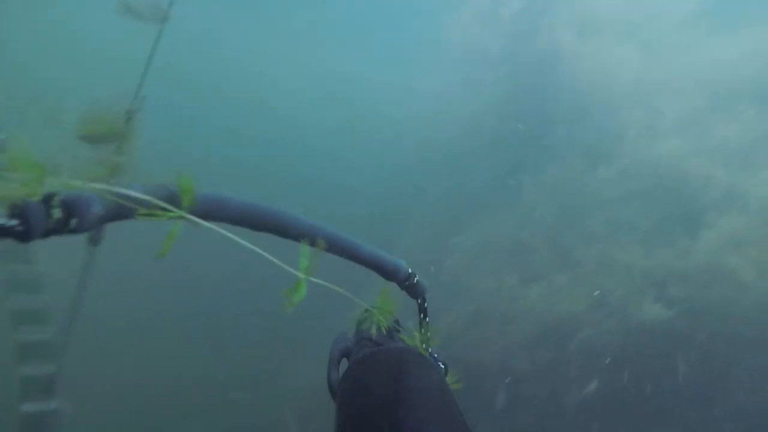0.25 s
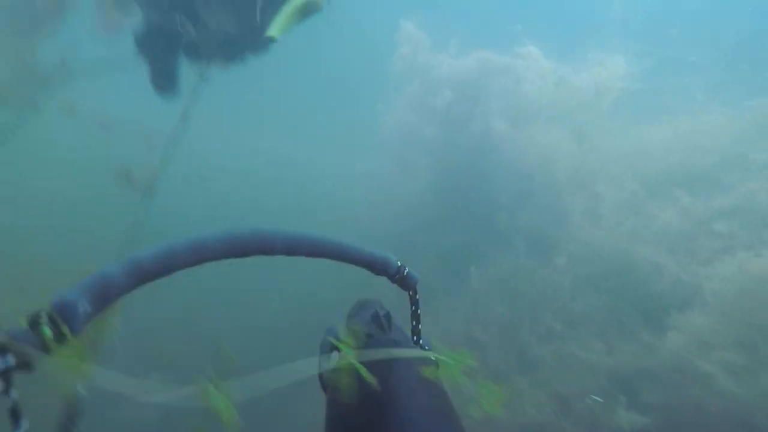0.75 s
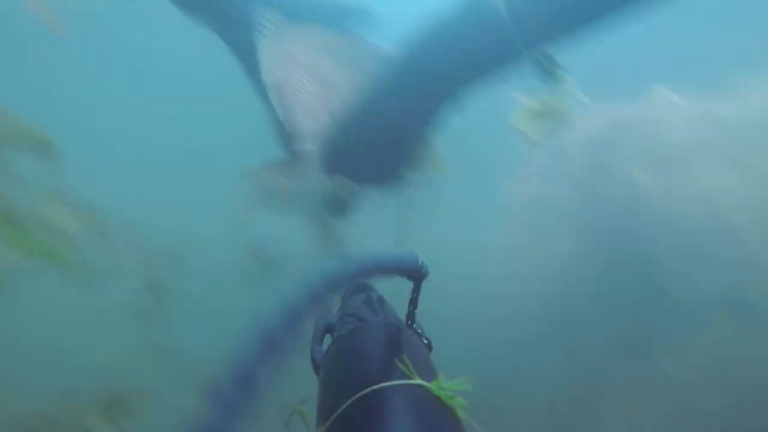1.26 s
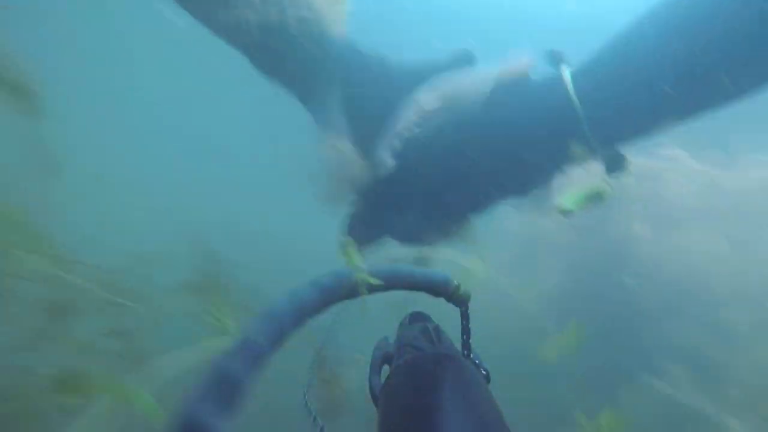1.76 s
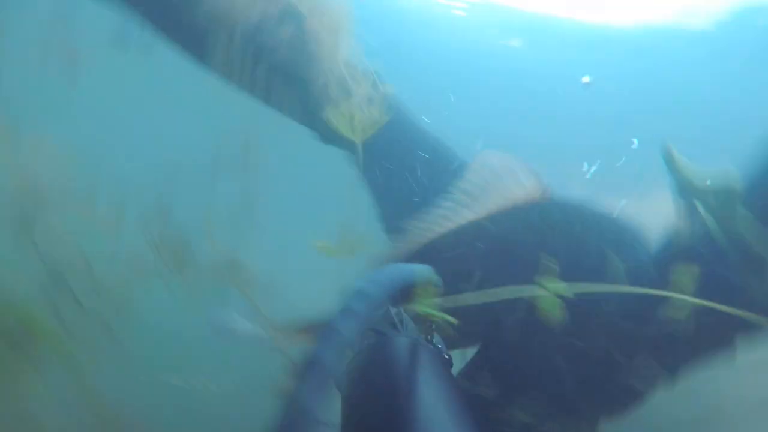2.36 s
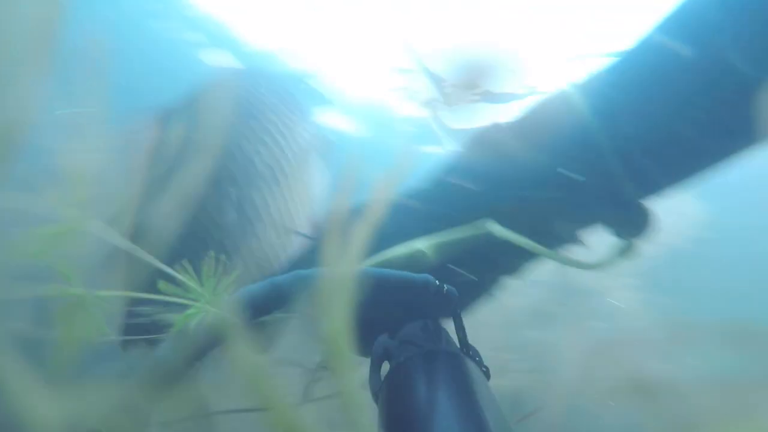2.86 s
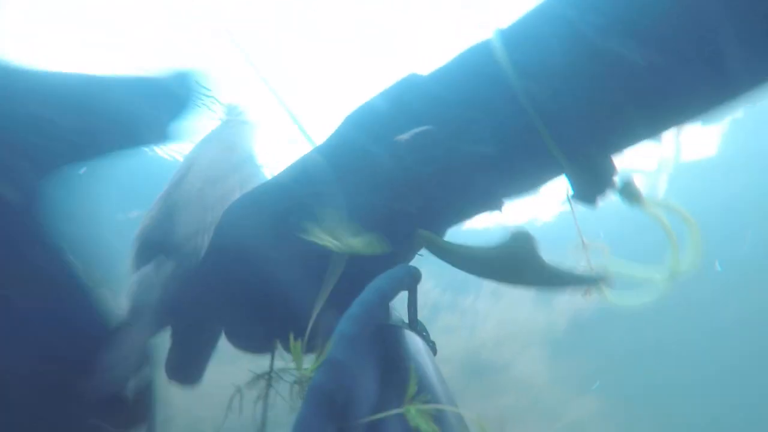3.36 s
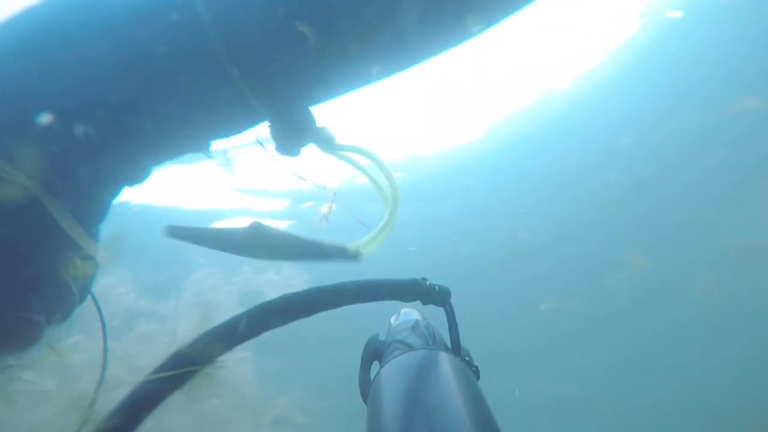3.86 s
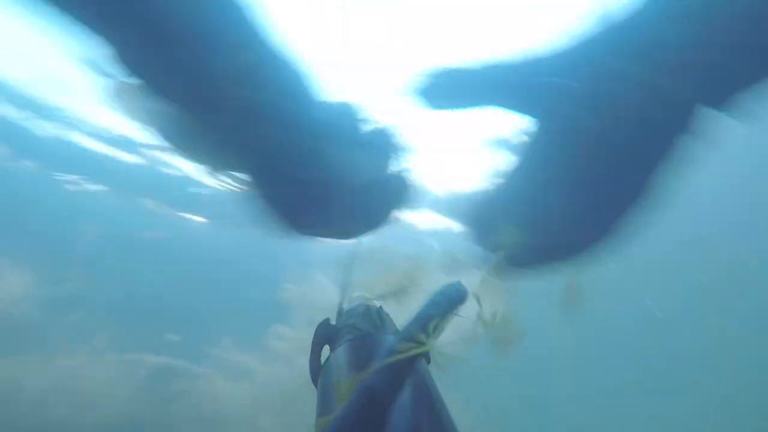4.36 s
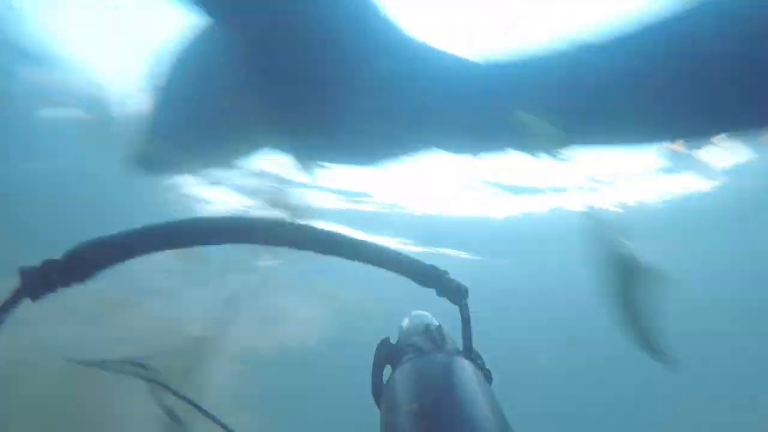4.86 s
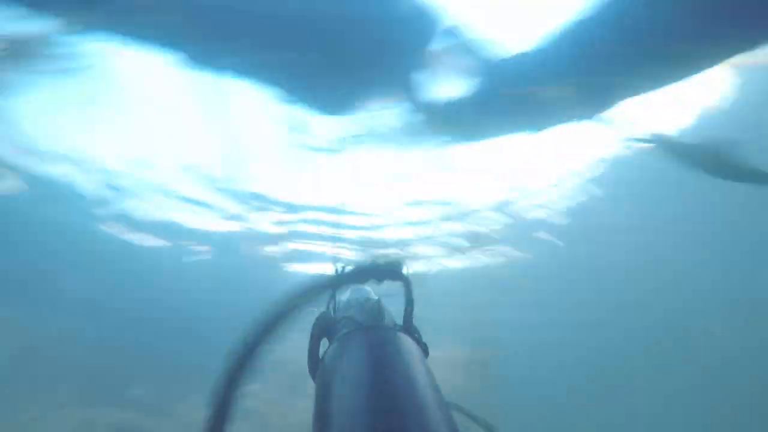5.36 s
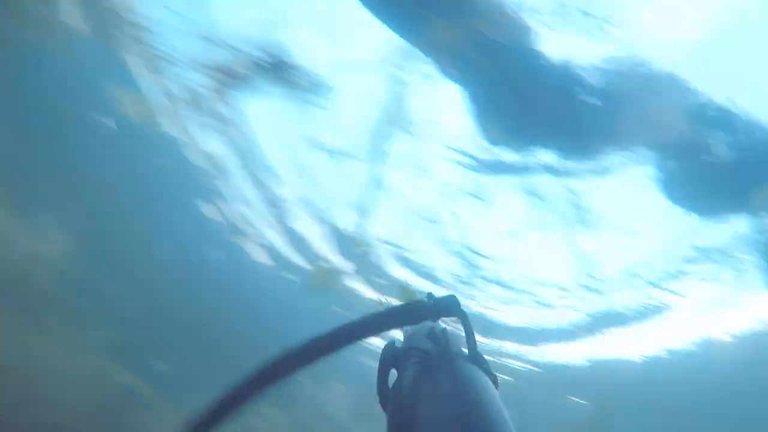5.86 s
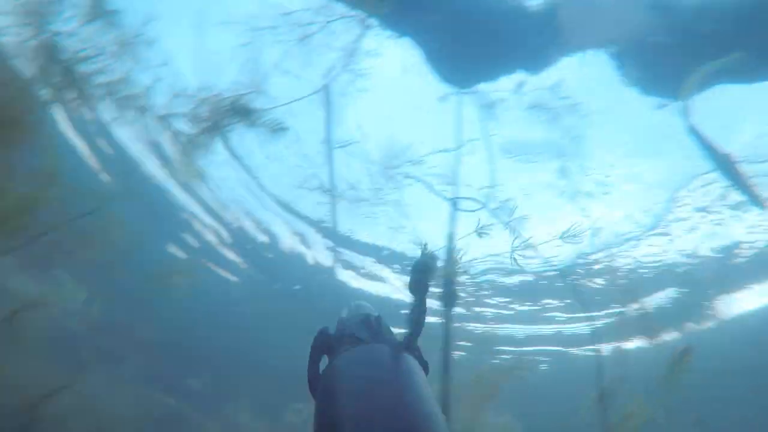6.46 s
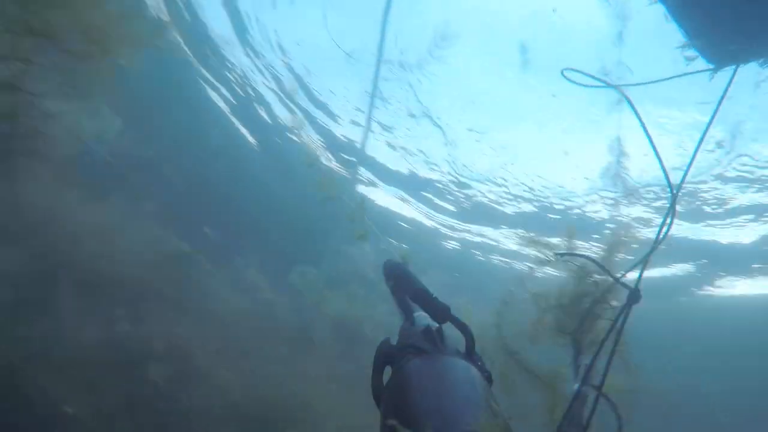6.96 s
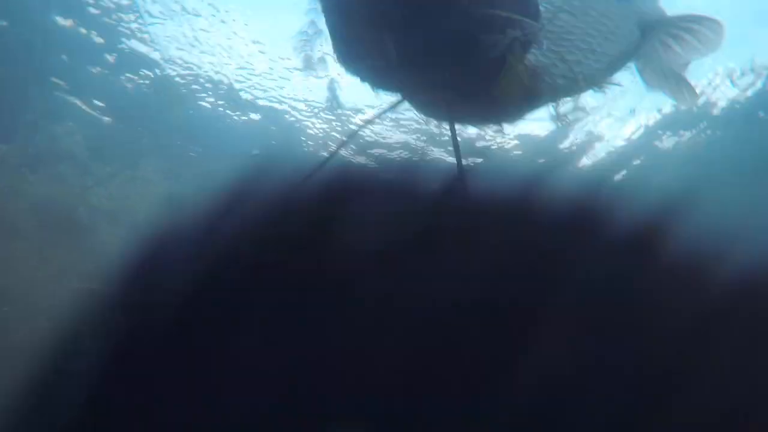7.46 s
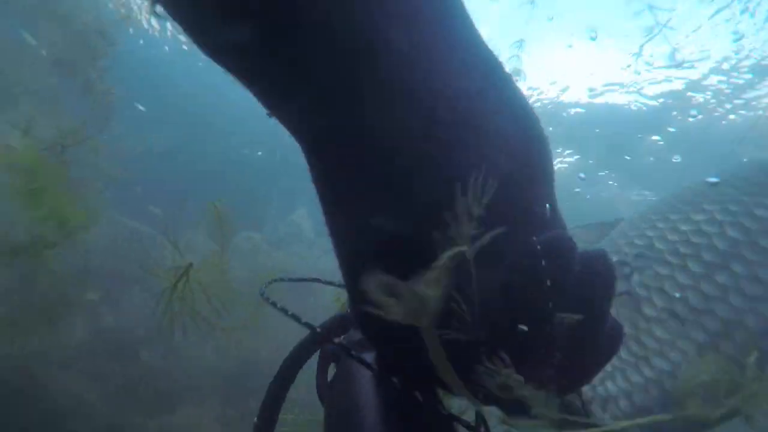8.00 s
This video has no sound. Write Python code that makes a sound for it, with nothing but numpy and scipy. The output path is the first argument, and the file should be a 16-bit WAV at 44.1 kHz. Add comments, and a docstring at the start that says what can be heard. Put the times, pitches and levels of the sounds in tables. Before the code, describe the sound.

Underwater handling noise: a deep wobbling hum, soft thuds and weed rubbing over a hollow shell, building to hard clacks near seven seconds.

```python
"""Speargun housing knocked about under water

A camera in a plastic housing rides on a diver's speargun in shallow water while the diver grapples with a fish.
Jolts ring the mount at its low resonance; thumps, knocks and scrapes excite the modes of the shell.
Water, line and weed drag over it as noise through those modes; small ticks, pings and crackle lie on top.
Two microphones inside hear each mode with their own level and phase."""
import sys
import numpy as np
from scipy import signal
from scipy.io import wavfile

SR = 44100
rng = np.random.default_rng(int(sys.argv[2]) if len(sys.argv) > 2 else 0)


def to_wav(s):
    """Save 16-bit WAV."""
    ch = np.atleast_2d(s).T  # columns
    pcm = np.round(np.clip(ch, -1, 1) * 32767)  # PCM
    wavfile.write(sys.argv[1], SR, pcm.astype(np.int16))


N = 362943

# modes of the big panels, base values that each source scales:
# pitch_hz, width_hz, level_db, left_minus_right_db, left_lead_rad
PANEL_MODES = [(119.5, 29, -15, 5, 0.1), (176.6, 38.8, 1.5, 3, 0.63), (252, 47.8, 0.5, 7, 0.94),
               (304, 220, -7.5, -1.5, 2.35), (396.4, 61.5, -9.5, 2, 0.09), (491, 60, -13, 3, 3.78)]
# modes of the stiff parts, same columns
STIFF_MODES = [(716, 104, 2, 0.5, 1.95), (862, 109, 0.5, -1, 2.44), (1000, 174, -11, -1, 2.29),
               (1330, 232, -8, -1.5, 2.01), (1772, 320, -9, -1.5, 1.36), (1995, 260, -6.5, -2, 1.38),
               (2600, 390, -12.5, 3, -1.5), (3280, 550, -14, 0, 0.95)]


def from_db(db):
    """Decibels to amplitude gain."""
    return 10 ** (np.asarray(db) / 20)


def rms_one(x):
    """Scale to rms 1."""
    return x / np.sqrt(np.mean(np.abs(x) ** 2) + 1e-20)


def in_time(rows):
    """Interpolate each column of a curve to one value per sample."""
    s, *columns = np.transpose(rows)
    return [np.interp(np.arange(N) / SR, s, column) for column in columns]


def drift(rate_hz):
    """Slow random curve of rms 1: noise at every 40th sample through a double one-pole low-pass."""
    pole = np.exp(-80 * np.pi * rate_hz / SR)
    noise = rng.standard_normal(N // 40 + 2002)
    slow = signal.lfilter([1], [1, -2 * pole, pole * pole], noise)[2000:]  # drop the settling
    return np.interp(np.arange(N) / 40, np.arange(len(slow)), rms_one(slow))


def butter(x, hz, kind, order=2):
    """Butterworth filter along time."""
    return signal.sosfilt(signal.butter(order, hz, kind, fs=SR, output="sos"), x)


def resonate(force, hz, width_hz):
    """Complex motion of one mode; a unit click rings from height 1."""
    pole = np.exp((2j * hz - width_hz) * np.pi / SR)
    return signal.lfilter([1], [1, -pole], force + 1e-18)


def at_ports(motion, balance_db, lead_rad):
    """Two microphones sit on different spots of a mode: own level, own phase."""
    side = np.array([[.5], [-.5]])
    return np.real(motion * from_db(balance_db * side) * np.exp(1j * lead_rad * side))


def strokes(rows, shapes):
    """Lay one shape at each row's time with the row's level."""
    out = np.zeros(N + shapes.shape[1])
    for (start_s, level_db, *_), shape in zip(rows, shapes):
        out[round(start_s * SR):][:len(shape)] += from_db(level_db) * shape
    return out[:N]


def push(hz, turns):
    """Force under a smooth window of a few turns of one pitch; the window sums to 1, the cosine is doubled."""
    t = np.arange(4000) / SR
    window = np.sin(np.pi * np.clip(t * hz / turns, 0, 1)) ** 2
    return 2 * window * np.cos(2 * np.pi * hz * t) / window.sum()


def lay(rows, shapes, gain_db):
    """Each small contact reaches the two microphones with a random balance and phase."""
    out = np.zeros((2, N))
    spots = rng.standard_normal((len(rows), 2))
    for (start_s, level_db, _), shape, (balance, lead_rad) in zip(rows, shapes, spots):
        heard = from_db(level_db + gain_db) * at_ports(shape, 1.5 * balance, lead_rad)
        out[:, round(start_s * SR):][:, :len(shape)] += heard
    return out


def held(rows, rise_s, fall_s):
    """For each row a shape that rises from the start, holds at 1 and falls after the end."""
    t = np.arange(N) / SR
    return np.array([np.clip(np.minimum((t - start_s) / rise_s, 1 + (end_s - t) / fall_s), 0, 1)
                     for start_s, end_s, *_ in rows])


def struck_modes():
    """Modes that a touch reaches; the panels among them are raised by 22.5 dB."""
    panels = [(hz, width_hz, level_db + 22.5, *ports) for hz, width_hz, level_db, *ports in PANEL_MODES[1:]]
    return panels + STIFF_MODES


def mount():
    """The mount sways near its resonance and rings after each jolt; beneath it the water heaves slowly."""
    # sway of the mount in the water: time_s, level_db
    sway_curve = [(0.0, -29.5), (0.92, -40), (1.4, -24), (3.96, -28.5), (4.51, -27), (5.13, -24),
                  (5.91, -23), (6.1, -28.5), (8.23, -21.5)]
    # jolts of the mount: start_s, force_level_db
    jolts = [(1.076, -19), (1.224, -19.5), (1.394, -4.5), (1.939, -4), (2.243, -15), (2.958, -17),
             (3.062, -10.5), (3.308, -20), (4.212, -2), (4.351, -7.5), (4.911, -6.5), (5.312, -13.5),
             (5.398, -14), (5.497, -7.5), (5.828, -8), (6.297, -19), (6.806, -14), (7.346, -10),
             (7.483, -8.5), (7.829, -8), (8.087, -10.5), (8.171, -14)]
    mount_hz, sway_width_hz, jolt_width_hz = 62.64, 9.9, 4.87

    sway_db, = in_time(sway_curve)
    sway = rms_one(resonate(butter(rng.standard_normal(N), 84, "low"), mount_hz, sway_width_hz))
    sway = rms_one(sway / (np.abs(sway) + 15.0)) * from_db(sway_db)  # strong swings slightly flattened

    signs = rng.choice([-1, 1], len(jolts))
    kicks = strokes(jolts, np.outer(signs, push(mount_hz, turns=1.1)))
    motion = sway + resonate(kicks, mount_hz, jolt_width_hz)

    heave = rms_one(butter(rng.standard_normal(N), [18, 48], "band")) * from_db(1.5 * drift(0.39))
    heave_db = -29.5 + 1.12 * (sway_db + 26.0)
    direct_kicks = 0.25 * butter(kicks, 54, "low") * SR / 400
    return at_ports(motion, -.4, 0) + heave * from_db(heave_db) + direct_kicks


def thumps():
    """A soft push sets ringing the panels whose pitch lies near its own."""
    # dull thumps on the panels: start_s, force_level_db, pitch_hz
    thump_rows = [(1.403, -7.5, 144), (1.53, -18, 230), (1.718, -6.5, 92), (2.262, -8, 255),
                  (2.284, -8, 260), (2.508, -11, 240), (3.026, -3, 143), (3.216, -12, 188),
                  (4.123, -3, 169), (4.929, 0, 113.4), (5.255, -6, 140), (5.415, -6.5, 168),
                  (5.957, -2, 172), (6.815, -6, 102), (7.094, -7, 226), (7.355, -2.5, 95),
                  (8.09, -10.5, 166)]
    force = strokes(thump_rows, np.array([push(hz, turns=2.63) for _, _, hz in thump_rows]))
    out = 0
    for hz, width_hz, level_db, balance_db, lead_rad in PANEL_MODES:
        motion = resonate(force, hz, 0.65 * width_hz)
        out = out + from_db(0.39 * level_db) * at_ports(motion, balance_db, lead_rad)
    return out


def drag():
    """Gains of panels, rubbing and hiss: steady drag with brief dips, plus shoves and swishes added as power."""
    # steady drag of the water over the shell: time_s, panels_db, rubbing_db
    steady_drag = [(0.1, -26.5, -39.5), (0.3, -31, -46.5), (0.42, -41, -50.5), (0.95, -41, -48.5),
                   (1.15, -27.5, -41.5), (2.1, -29, -39.5), (3.68, -28, -41.5), (3.78, -31.5, -52),
                   (4.0, -32, -49.5), (4.3, -27.5, -36), (5.2, -31, -48.5), (5.6, -24.5, -35),
                   (6.0, -27.5, -45), (6.7, -33, -46.5), (7.0, -24, -39.5), (8.23, -27.5, -34)]
    # steady fine hiss: time_s, level_db
    steady_hiss = [(0.0, -57), (0.6, -60), (1.7, -57.5), (3.6, -57.5), (4.4, -63.5), (6.0, -58.5),
                   (8.23, -64)]
    # brief dips of the level, several just after the loudest hits: start_s, end_s, level_depth_db, hiss_depth_db
    dips = [(1.831, 2.046, 5, 0.5), (4.243, 4.29, 3.5, 6), (6.018, 6.168, 6, 2), (7.102, 7.217, 4, 8),
            (7.487, 7.535, 4, 0), (7.894, 7.966, 20, 25)]
    # shoves that load the big panels: start_s, end_s, level_db
    shove_rows = [(2.226, 2.358, -25), (2.697, 2.81, -24), (3.014, 3.21, -23.5), (3.789, 3.913, -24),
                  (4.175, 4.531, -21), (4.739, 4.889, -24.5), (5.284, 5.41, -20.5), (5.406, 5.53, -14.5),
                  (5.738, 5.86, -22.5), (5.817, 6.007, -19), (6.763, 6.858, -22), (7.046, 7.093, -24),
                  (7.392, 7.467, -18), (7.787, 7.9, -22.5)]
    # swishes of weed and line past the shell: start_s, end_s, rubbing_db, hiss_db
    swishes = [(2.4, 2.483, -38, -50.5), (2.516, 2.704, -37.5, -50), (3.08, 3.146, -37, -54.5),
               (4.022, 4.184, -40.5, -57), (4.34, 4.527, -34, -72), (4.822, 4.925, -35, -67),
               (4.913, 4.959, -42, -53), (5.217, 5.331, -35, -71), (5.342, 5.565, -32.5, -57.5),
               (5.8, 5.892, -36, -56.5), (6.26, 6.318, -35, -60), (6.78, 6.956, -38, -57),
               (7.042, 7.118, -33, -62), (7.178, 7.35, -34, -78), (7.388, 7.491, -27.5, -40.5),
               (7.552, 7.84, -36.5, -50), (7.835, 7.878, -24.5, -41.5), (7.982, 8.062, -50, -50)]

    depths_db = np.array(dips)[:, 2:].T @ held(dips, rise_s=0.0087, fall_s=0.044)
    level_depth_db, hiss_depth_db = depths_db
    panel_power, rub_power = from_db(np.array(in_time(steady_drag)) - level_depth_db) ** 2
    hiss_power = from_db(in_time(steady_hiss)[0] - hiss_depth_db) ** 2

    shove_shapes = held(shove_rows, rise_s=0.023, fall_s=0.016)
    shove_power = from_db(np.array(shove_rows)[:, 2]) ** 2 @ shove_shapes ** 2
    swish_shapes = held(swishes, rise_s=0.013, fall_s=0.015)
    swish_rub, swish_hiss = from_db(np.array(swishes)[:, 2:].T) ** 2 @ swish_shapes ** 2
    return np.sqrt([panel_power + shove_power, rub_power + swish_rub, hiss_power + swish_hiss])


def shaken(modes, patchy_db, rate_hz, grain_db):
    """Each mode driven by its own lumpy noise, resonating twice so the valleys stay dark; rms 1."""
    out, together = 0, drift(rate_hz)
    for hz, width_hz, level_db, balance_db, lead_rad in modes:
        grains = rng.standard_normal(N) * from_db(grain_db * drift(hz / 12))
        force = grains * from_db(patchy_db * (together + 0.66 * drift(rate_hz)))
        motion = resonate(resonate(force, hz, width_hz), hz, 2 * width_hz)
        out = out + from_db(level_db) * at_ports(rms_one(motion), balance_db, lead_rad)
    return rms_one(out)


def handling(panel_gain, rub_gain, hiss_gain):
    """Shoving moves the big panels, rubbing the stiff ones, the finest grit hisses on top."""
    # modes of the fine hiss: pitch_hz, width_hz, level_db, left_minus_right_db, left_lead_rad
    hiss_modes = [(5720, 650, -9.5, 0, -2.5), (6350, 970, -11.5, -12.5, 4), (11500, 6000, -11, -4.5, 1.8)]
    shove = shaken(PANEL_MODES, patchy_db=2.6, rate_hz=9.6, grain_db=0.0)
    rub = shaken(STIFF_MODES, patchy_db=2.2, rate_hz=14, grain_db=3.0)
    hiss = shaken(hiss_modes, patchy_db=1.5, rate_hz=30, grain_db=1.5)
    # part that each microphone hears alone
    loose = butter(rng.standard_normal((2, N)), [3900, 9400], "band", order=3)
    hiss = rms_one(hiss + 1.14 * rms_one(loose))
    return panel_gain * shove + rub_gain * rub + hiss_gain * hiss


def knocks():
    """Short ragged blows; modes near a blow's centre answer most, each with a random strength."""
    # knocks on the gear: start_s, force_level_db, centre_hz
    knock_rows = [(1.007, -34, 790), (2.167, -25, 815), (2.5, -27, 700), (2.512, -22.5, 900),
                  (2.549, -38, 700), (4.117, -18.5, 760), (4.231, -26, 1690), (4.250, -32, 1750),
                  (5.232, -33, 2000), (5.301, -26, 2300), (5.322, -23, 1100), (5.411, -25.5, 750),
                  (5.497, -16, 1500), (5.53, -35, 1900), (5.834, -23.5, 2050), (5.921, -23.5, 1470),
                  (5.949, -29.5, 1600), (7.094, -6, 1720), (7.103, -17.5, 1660), (7.409, -15.5, 1010),
                  (7.421, -17, 1380), (7.437, -21, 700), (7.447, -14.5, 1150), (7.741, -27.5, 3000),
                  (7.882, -8, 1200), (8.062, -30, 2600)]
    modes, t = struck_modes(), np.arange(320) / SR
    centre_hz = np.array(knock_rows)[:, [2]]
    noise = rng.standard_normal((len(knock_rows), len(t)))
    blows = np.array([rms_one(row * np.exp(-t / 0.0031)) for row in noise])

    rung = 0
    for hz, width_hz, level_db, balance_db, lead_rad in modes:
        strength_db = 1.6 * rng.standard_normal((len(knock_rows), 1))
        reach_db = strength_db - 6 * np.log2(hz / centre_hz) ** 2
        force = strokes(knock_rows, blows * from_db(reach_db))
        force = butter(force + 1e-18, [0.13 * hz, 1.1 * hz], "band")
        motion = resonate(force, hz, 1.37 * width_hz)
        rung = rung + from_db(-15 + 0.2 * level_db) * at_ports(motion, balance_db, lead_rad)
    rung = butter(butter(rung, 120, "high"), 3430, "low", order=4)

    crack_db = -30 + 8.0 * np.log2(centre_hz / 2000)  # higher-centred blows crack more
    crack = strokes(knock_rows, blows * np.exp(-t / 0.003) * from_db(crack_db))
    return rung + butter(crack, 3500, "high") * [[.8], [-1]]  # opposite sign at the two microphones


def scrapes():
    """Grit of uneven size dragged over the shell; modes near the centre of the rub answer most."""
    # abrupt scrapes: start_s, end_s, level_db, centre_hz, fall_db_per_octave_squared
    scrape_rows = [(1.045, 1.211, -45, 1230, 28), (1.606, 1.641, -34.5, 715, 49),
                   (2.256, 2.344, -21, 740, 9), (2.254, 2.344, -37, 2670, 40),
                   (2.498, 2.575, -24, 820, 3.5), (2.598, 2.679, -41, 1330, 40),
                   (4.207, 4.264, -17.5, 614, 10), (4.385, 4.528, -35.5, 1850, 35),
                   (5.921, 5.958, -23, 920, 7), (7.258, 7.298, -35.5, 1750, 27),
                   (7.394, 7.485, -28, 1050, 16), (7.403, 7.427, -16.5, 1140, 41)]
    grit_per_s, grit_spread_db = 1500, 3.5
    modes, out = struck_modes(), np.zeros((2, N))
    for start_s, end_s, scrape_db, centre_hz, fall_db in scrape_rows:
        t = np.arange(round((end_s - start_s + 0.021) * SR)) / SR  # room to ring out
        pressed = np.clip(t / 0.004, 0, 1) * (t < end_s - start_s)
        sizes = from_db(grit_spread_db * np.minimum(rng.exponential(1, len(t)), 4))
        grit = (rng.random(len(t)) < grit_per_s / SR) * sizes
        rub = 0
        for hz, width_hz, level_db, balance_db, lead_rad in modes:
            force = rng.standard_normal(len(t)) * (0.1 + grit) * pressed
            motion = resonate(resonate(force, hz, 0.65 * width_hz), hz, 3 * width_hz)
            answer_db = 0.64 * level_db - fall_db * np.log2(hz / centre_hz) ** 2
            loose_lead_rad = lead_rad + 0.36 * rng.standard_normal()
            rub = rub + from_db(answer_db) * at_ports(rms_one(motion), balance_db, loose_lead_rad)
        out[:, round(start_s * SR):][:, :len(t)] += from_db(scrape_db) * rms_one(rub)
    return butter(out + 1e-18, 2950, "low", order=4)


def ticks():
    """Tiny hard contacts: ragged bursts of a few milliseconds, broad around their centre."""
    # ragged ticks, level ahead of gain_db: start_s, level_db, centre_hz
    tick_rows = [(0.538, -44.5, 2720), (0.968, -46, 2880), (1.265, -41.5, 3920), (1.279, -46, 5700),
                 (1.674, -41, 6320), (1.727, -40.5, 2780), (1.733, -40.5, 7250), (1.877, -45.5, 2400),
                 (1.935, -41, 3770), (2.026, -44, 3320), (3.044, -43, 6060), (4.637, -40, 3070),
                 (5.786, -40, 3000), (5.837, -40, 4180), (5.858, -37, 2900), (5.866, -42.5, 6040),
                 (5.877, -41, 2660), (5.841, -31, 2000)]
    t = np.arange(600) / SR
    shapes = []
    for _, _, hz in tick_rows:
        burst = rng.standard_normal(len(t)) * np.exp(-t / 0.0025)
        rung = resonate(butter(burst, [0.65 * hz, 1.4 * hz], "band"), hz, 0.13 * hz)
        shapes.append(rung / np.abs(rung).max())
    return lay(tick_rows, shapes, gain_db=7.5)


def pings():
    """Clear pings, as of small bubbles: a broad snap, then a few cycles at one pitch."""
    # pings, level ahead of gain_db: start_s, level_db, pitch_hz
    ping_rows = [(4.126, -30.5, 3360), (4.136, -31.5, 3300), (4.924, -34, 2410), (4.935, -32.5, 2670),
                 (5.971, -40.5, 2800), (5.995, -47, 2400)]
    t = np.arange(900) / SR
    shapes = []
    for _, _, hz in ping_rows:
        attack = 1 - np.exp(-t / 0.0002)
        decay = np.exp(-hz / 14.4 * t) + 0.6 * np.exp(-1.3 * hz * t)
        shapes.append(attack * decay * np.exp(2j * np.pi * hz * t))
    return lay(ping_rows, shapes, gain_db=8.0)


def shaft():
    """The metal shaft rings faintly after the hardest knock in thin long modes; the hand on it stops them soon."""
    # shaft modes: pitch_hz, level_db
    shaft_modes = [(883, -41), (1244, -44), (2557, -52), (3806, -57)]
    struck_s, width_hz = 7.096, 2.2
    t = np.clip(np.arange(N) / SR - struck_s, 0, None)
    hand = np.clip((0.11 - t) / 0.026, 0, 1)
    envelope = (t > 0) * np.exp(-np.pi * width_hz * t) * hand
    return envelope * sum(from_db(level_db) * np.sin(2 * np.pi * hz * t) for hz, level_db in shaft_modes)


def contacts():
    """All that touches the gear, with the bubble-like pings."""
    return knocks() + scrapes() + ticks() + pings() + shaft()


def crackle(hiss_db):
    """Faint random ticks of grit and tiny bubbles, more and louder while the hiss is strong."""
    ticks_per_s = 22 * from_db(.3 * (hiss_db + 60))
    born = rng.random(N) < ticks_per_s / SR
    sizes = from_db(-49 + 0.5 * (hiss_db + 51) + 4 * np.minimum(rng.exponential(1, N), 2.5))
    dealt, out = rng.integers(0, 8, N), 0  # each tick gets one of eight pitches
    for k, hz in enumerate(np.geomspace(2200, 7000, 8)):
        force = butter(born * sizes * (dealt == k) + 1e-18, [0.48 * hz, 2.0 * hz], "band")
        out = out + at_ports(resonate(force, hz, hz / 12.0), -1.5, 1.0 * k)
    return out


def scene():
    """Everything that reaches the two microphones."""
    gains = drag()
    hiss_db = 20 * np.log10(gains[2])
    return mount() + thumps() + handling(*gains) + contacts() + crackle(hiss_db)


def record(dry):
    """A faint dull hiss of the electronics; peaks are rounded, the top is cut."""
    hiss = from_db(-63.0) * rms_one(butter(rng.standard_normal(dry.shape), [300, 3500], "band"))
    rounded = 1.3 * np.tanh((dry + hiss) / 1.3)
    top_cut = signal.cheby2(12, 70, 15300, fs=SR, output="sos")  # 70 dB down from 15300 Hz
    return signal.sosfilt(top_cut, rounded)


dry = scene()
out = record(dry)
to_wav(out)
```